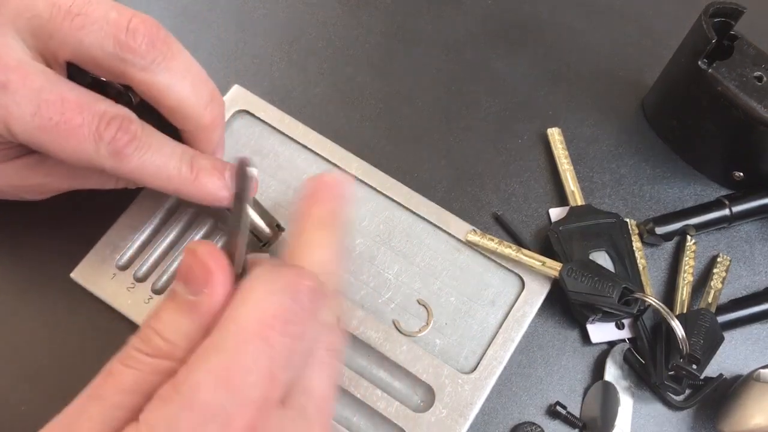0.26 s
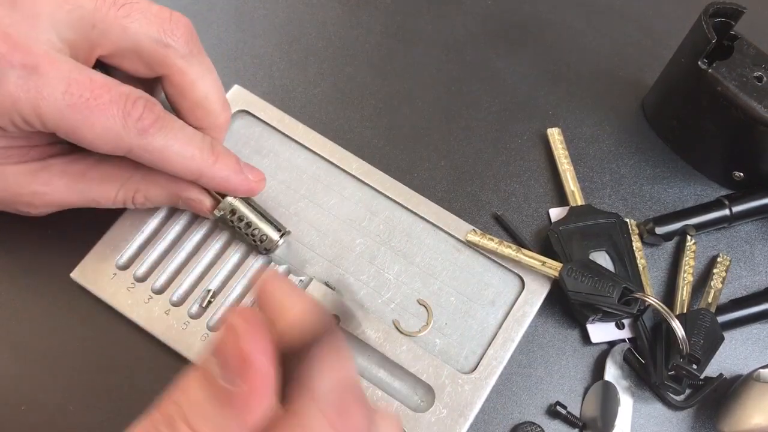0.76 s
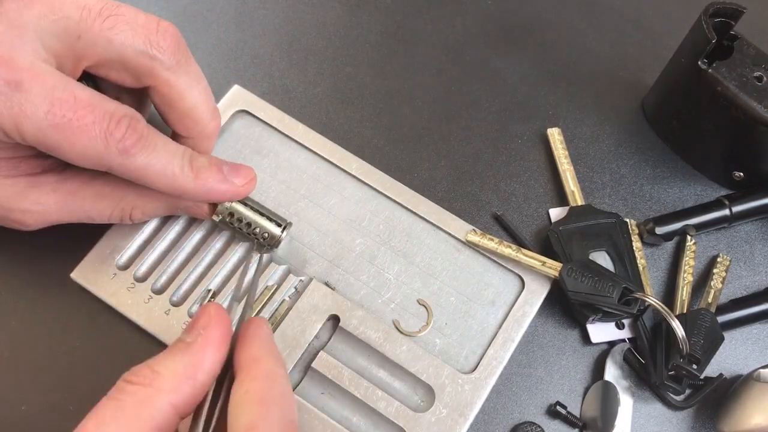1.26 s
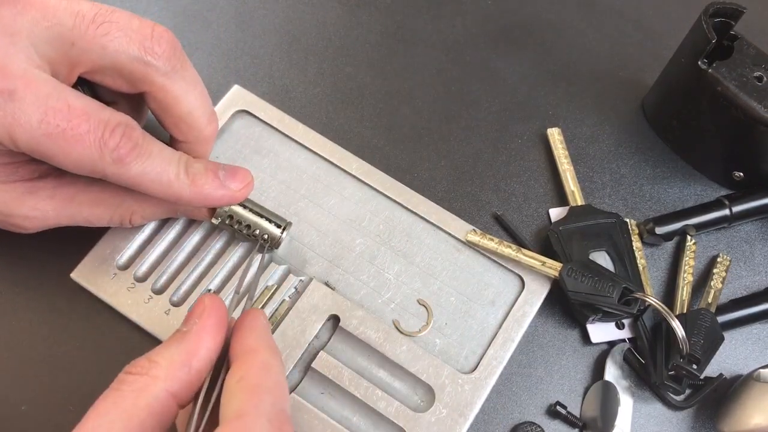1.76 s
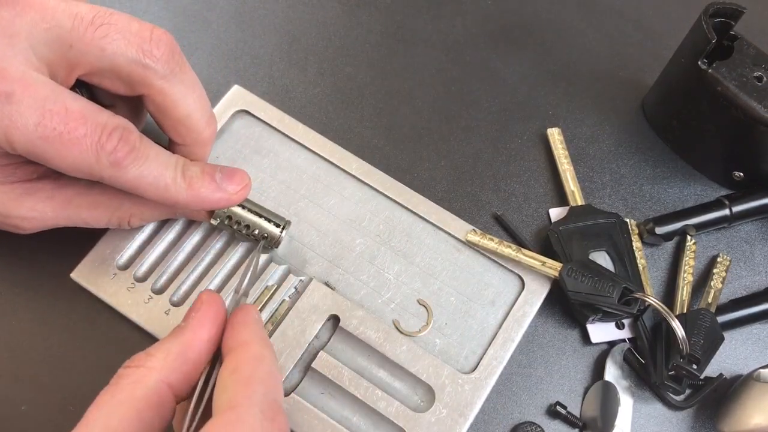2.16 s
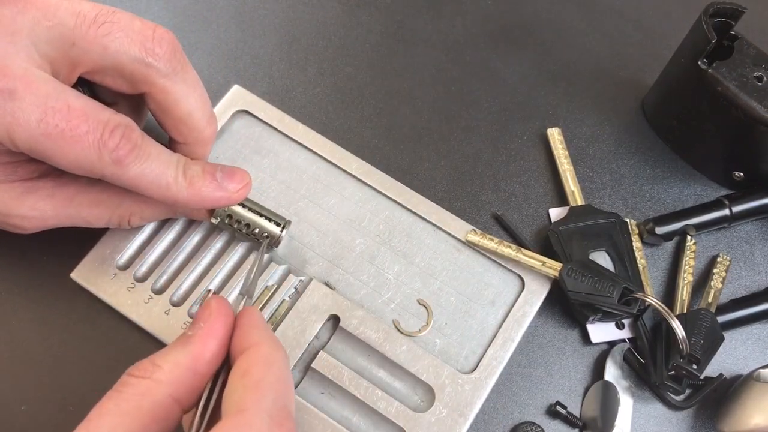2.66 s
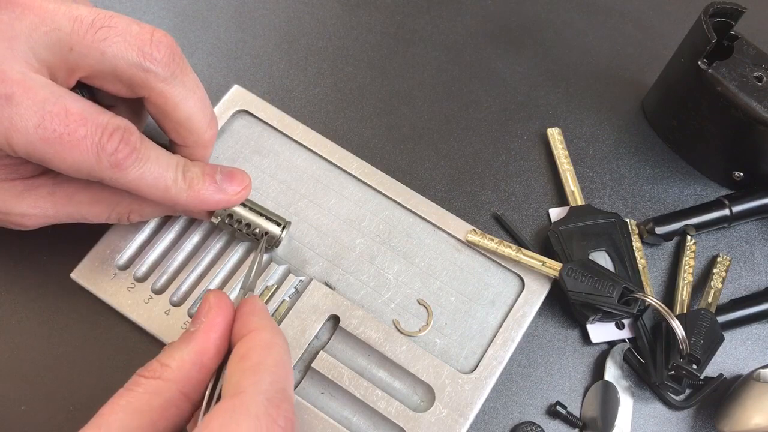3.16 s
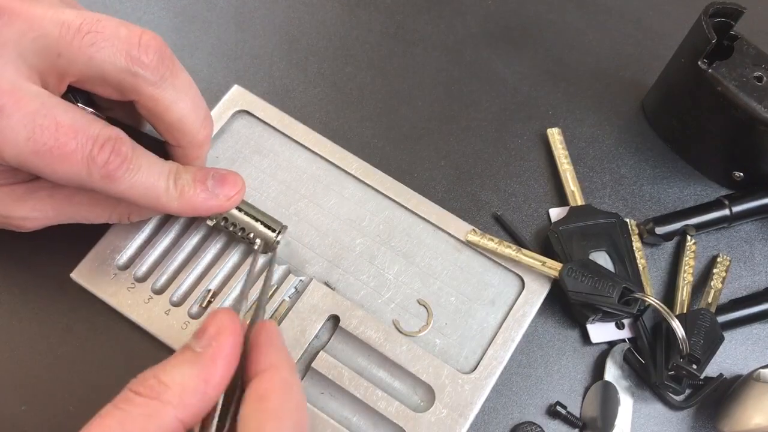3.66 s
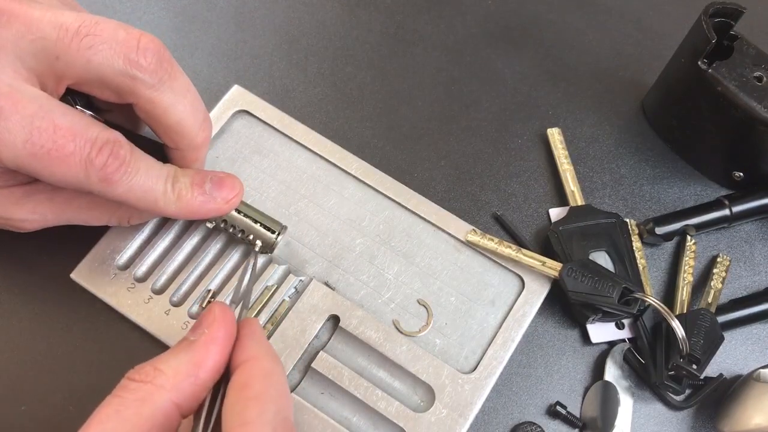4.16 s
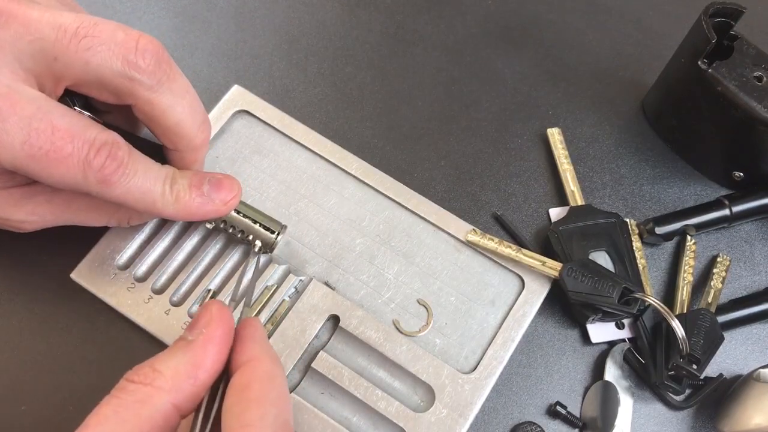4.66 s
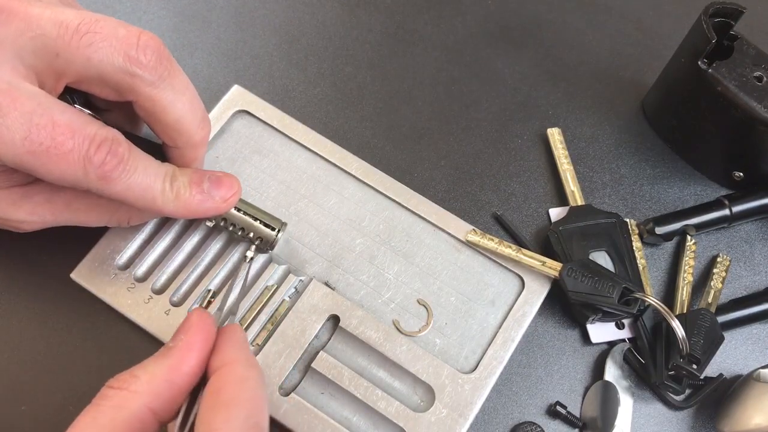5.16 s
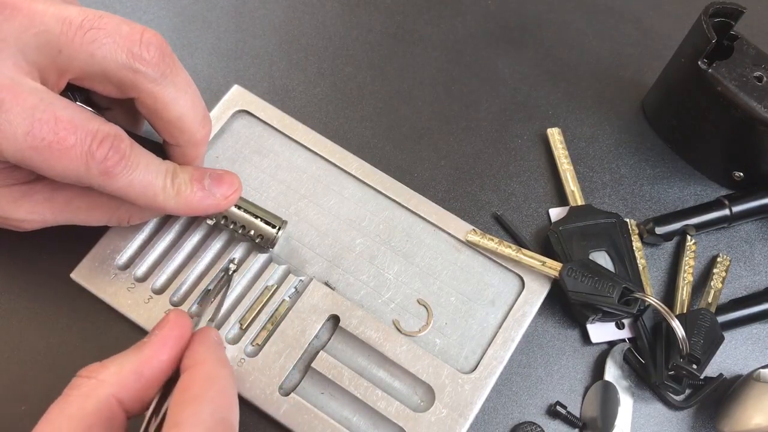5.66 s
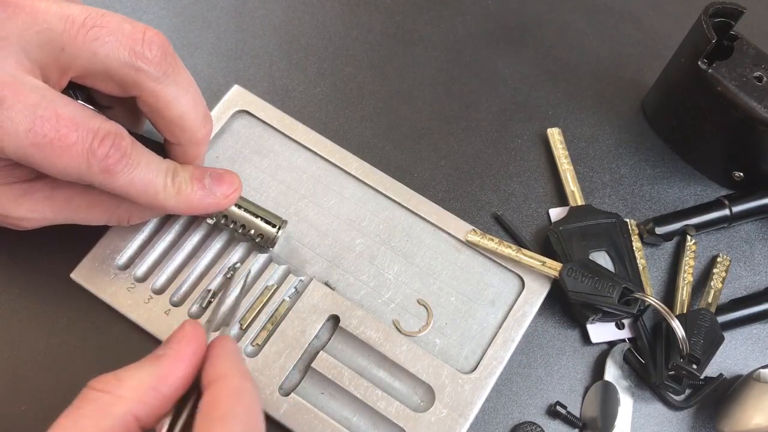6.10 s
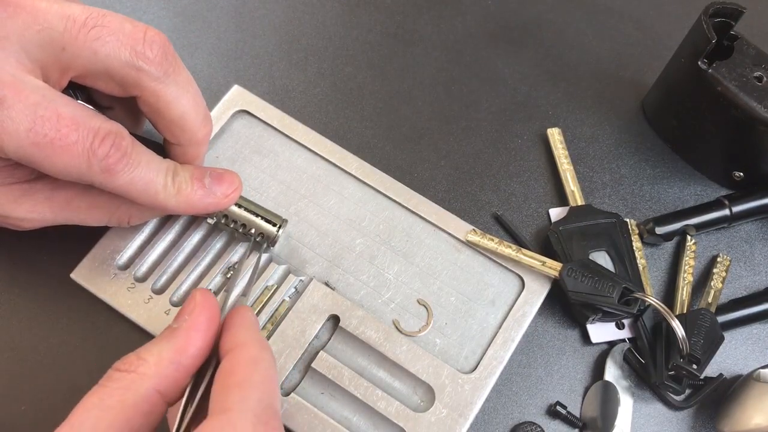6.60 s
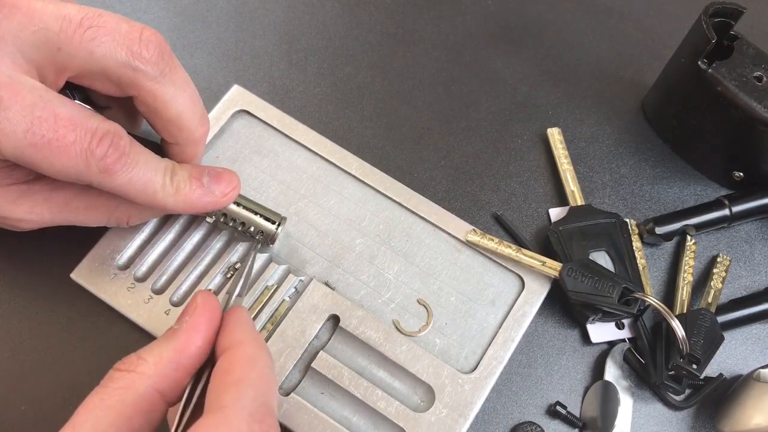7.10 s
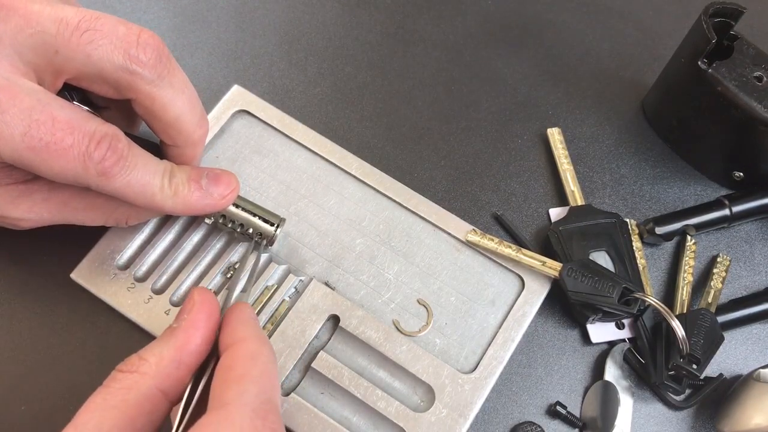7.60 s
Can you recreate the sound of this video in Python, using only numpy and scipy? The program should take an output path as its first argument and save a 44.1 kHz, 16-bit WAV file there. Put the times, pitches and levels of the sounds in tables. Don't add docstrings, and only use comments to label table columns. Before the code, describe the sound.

A hard, bright clank on a thick metal tray opens the scene, followed by a busy half second of lighter taps, dull desk thuds and a brief scrape. Then it grows quiet, with tiny nudges and isolated crisp ticks of pins and tweezers, sharper around two and three seconds. Close phone microphone, small quiet room, faint hiss and low hum.

```python
import sys
import numpy as np
from scipy import signal
from scipy.fft import rfft, irfft
from scipy.io import wavfile
from scipy.ndimage import uniform_filter1d

SR = 44100
rng = np.random.default_rng(int(sys.argv[2]) if len(sys.argv) > 2 else 0)


def unload_audio(sound):
    columns = np.transpose(np.atleast_2d(sound))
    steps = np.round(np.clip(columns, -1, 1) * 32767)
    wavfile.write(sys.argv[1], SR, steps.astype(np.int16))


def makeup_ratio(level_db):
    decades = np.asarray(level_db, float) / 20
    return 10 ** decades


N = 345744

# pitch_hz, density_db_per_hz
AIR_SPECTRUM = [(16, -32), (28, -1.5), (59, -13.5), (71, -24.5), (108, -16), (144, -27), (220, -15),
                (279, -16.5), (302, -29.5), (354, -27), (869, -35), (1160, -33.5), (1510, -36),
                (10700, -39.5), (15500, -41)]
AIR_DB = -65.5
# pitch_hz, width_hz, level_db
HUM = [(43.7, 3.6, -64), (114.04, 22, -75), (208, 3.5, -80.5), (265, 23, -75)]
# start_s, hold_s, level_db
LEANS = [
    (0.0, .5, -42),
    (.74, 0.024, -44.5),
    (1.05, .06, -53.5),
    (2.3, 0.033, -47),
    (2.64, 0.32, -52.5),
    (3.3, 0.16, -44),
    (5.3, .6, -54),
    (6.15, .22, -52),
    (7.56, 0.15, -50.5),
]
LEAN_RISE_DB_S, LEAN_FALL_DB_S, STILL_DB = 121, 98, -55

# start_s, level_db, pitch_hz, ring_t60_s,
# rattle_ms
TICKS = [(0.0383, -34, 5100, 0.0038, 0.51), (0.424, -50, 5420, 0.008, 2.2), (0.7172, -55, 6030, 0.012, 3.1),
         (0.733, -53, 5232, 0.0064, 1.3), (2.079, -56, 4980, 0.016, 1.7), (2.2172, -29, 11560, 0.02, 4.7),
         (2.222, -28, 4500, 0.012, 1.9), (2.2287, -50, 5260, .13, 2), (2.568, -37.5, 8880, 0.05, 2.7),
         (2.9587, -61, 5100, 0.01, 1.1), (3.276, -54, 11070, .01, 1.3), (3.2815, -29.5, 11720, 0.005, 0.84),
         (3.2825, -30, 8460, 0.012, .9), (3.949, -50.5, 8416, 0.02, 1.8), (3.959, -48, 11400, 0.032, 5.4),
         (3.971, -56, 12300, 0.019, 9.8), (4.1777, -43, 5970, 0.027, 1.75), (4.188, -60, 8090, 0.013, 1.4),
         (4.2954, -42, 5720, 0.015, 3.4), (4.306, -35.5, 6750, 0.027, 3.3), (4.4088, -56, 8500, 0.03, 2.4),
         (5.5993, -57.5, 4000, 0.0031, 1.1), (5.842, -37, 8460, 0.015, 2.0), (6.758, -57, 5500, .015, 1.9)]
# share_of_pitch, level_db
PIN_MODES = [(1, 8.5), (1.3, -7.5), (0.78, -4), (1.5, -11.5)]
# pitch_hz, density_db_per_hz
RATTLE_SPECTRUM = [(400, -34), (1200, -22), (3300, -17), (4600, -5), (6500, -3), (8600, -1), (10200, -5),
                   (12000, 0), (14500, -2), (16000, -10)]
RATTLE_FALL_DB_OCT = 5.5
RING_DB, RING_DB_PER_DECADE = 0.5, -10.5

# pitch_hz, level_db (within the family), t60_s
TRAY_MODES = [(1110, -5, .04), (1153, 0, .05), (1370, -16, .03), (1500, -20, .04), (2500, -4, .04),
              (2556, 0, .05), (2660, -1, .025), (2800, -5, .025), (3050, -13, .03), (3541, 0, .035),
              (3590, -1, .03), (3680, -1, .02), (3781, -10, .035), (3934, -11, .045), (4483, -24, .03),
              (5030, -15, .025), (5170, 0, .035), (5420, -17, .03), (5700, -18, .03), (6862, -20, .045),
              (7332, -28, .03), (7724, -20, .05), (7823, -14, .065), (8166, -24, .03), (9130, -28, .02),
              (10060, -18, .04), (10960, -21, .04), (11900, -25, .025), (12830, -27, .015),
              (14300, -21, .015)]
TRAY_SPLIT_HZ = (1900, 3300, 4200)
# start_s, bending_db, second_db, upper_db, knock_db
CLANK = [
    (.0447, -15, -17, -3.5, -32.5),
]
# start_s, bending_db, second_db, upper_db, knock_db
TAPS = [(0.1835, -46, -39, -36, -48.5), (0.2392, -65, -56, -46.5, -52.5), (0.428, -44.5, -60, -57, -46),
        (0.4658, -57, -58, -67, -62), (0.4784, -42, -46.5, -48, -65), (0.4968, -45, -48.5, -55, -47.5),
        (0.5908, -57, -65, -66, -52), (0.61, -41.5, -47, -54, -46), (0.6305, -51, -53.5, -55, -56),
        (0.6726, -58.5, -54, -78, -53), (0.7347, -74, -72, -80, -63.5), (2.2213, -37.5, -52, -40, -46.5),
        (3.2762, -47, -59, -54, -47), (4.3075, -70, -67, -83, -66), (5.842, -78, -76, -61, -71)]
# start_s, bending_db, knock_db
NUDGES = [(0.2743, -56.5, -74.5), (0.5548, -52, -68), (0.8066, -68, -70), (0.976, -68.5, -69),
          (1.1995, -62, -72), (1.2948, -68.5, -78), (1.5878, -57.5, -63.5), (1.665, -65.5, -68),
          (1.8866, -68.5, -77), (2.2177, -43, -47.5), (2.2314, -42, -55.5), (2.5707, -59.5, -80),
          (2.615, -66.5, -88), (2.9567, -67.5, -72), (3.3179, -68, -67), (3.3778, -75, -65.5),
          (3.9488, -56, -58.5), (4.1749, -67, -75), (4.2986, -57, -61), (5.1937, -65.5, -71),
          (5.6311, -64.5, -65.5), (5.7084, -71, -70), (5.8143, -68.5, -75), (6.1819, -71.5, -69.5),
          (6.3194, -77, -69.5), (6.7974, -61, -66), (6.9113, -67, -75), (7.309, -72, -82),
          (7.6363, -59, -64.5), (7.7125, -67.5, -74)]
# pitch_hz, density_db_per_hz
KNOCK_SPECTRUM = [(250, -30.5), (520, -17), (770, 3), (1000, -3.5), (1400, -4), (1800, -9), (2700, -12),
                  (5000, -21.5), (12000, -38)]
# pitch_hz, density_db_per_hz
WASH_SPECTRUM = [(300, -5.5), (1500, -4.5), (2800, -2), (4400, -2.5), (6300, -3), (9000, -12), (14000, -16),
                 (16000, -26)]
THIRD_SHARE, THIRD_DB = 0.24, 2
LIGHT_CONTRAST, LIGHT_DB_PER_DECADE = 1.5, 30
LIGHT_DULL_DB_OCT = 8

# pitch_hz, density_db_per_hz
SHIMMER_SPECTRUM = [(1500, -25), (2300, -7.5), (2800, 1.5), (3500, -1.5), (4500, -8.5), (8000, -11),
                    (14000, -25.5)]
# pitch_hz, density_db_per_hz
SLAP_SPECTRUM = [(200, -12), (350, 1.5), (500, -0.5), (800, -3), (1500, -21.5)]
SHIMMER_DB, SHIMMER_MS, SLAP_DB, SLAP_MS = -30, 38, -24.5, 2.2

# pitch_hz, level_db, t60_s
DESK_MODES = [(22, 0, 0.2), (45, -7, 0.19), (118.55, -1.5, 0.49), (160.3, -1.5, 0.29), (201, -5.5, 0.018),
              (295, -5, 0.101), (321, -4.5, 0.093), (422, -11.5, 0.062)]
DESK_SPLIT_HZ = (150, 60)
DESK_SAG = .25
# start_s, thud_db, boom_db, sway_db, contact_ms
BUMPS = [(0.045, -40, -41, -55.5, 5.9), (0.109, -48.5, -40.5, -32.5, 3.1), (0.237, -35.5, -41.5, -57, 4.2),
         (0.423, -29.5, -37, -48, 2.86), (0.46, -41.5, -61, -36, 3.3), (0.594, -54, -67, -49, 0.95),
         (2.218, -38, -46, -53, 1.6), (3.278, -43.5, -56, -41, 1.27), (3.31, -51, -58, -36, 1.5),
         (3.952, -52, -67, -46, 2.9), (4.303, -53, -78, -63.5, 1.2), (7.835, -54.5, -60, -60, 2.2)]

# pitch_hz, width_hz, level_db
WOOD = [(222, 16, 0), (268, 16, 0), (370, 40, -8), (490, 40, -12), (580, 15, -13), (1000, 300, -18),
        (1150, 40, -18)]
# start_s, hold_s, level_db
HAND = [
    (.43, 0.0045, -46.5),
    (.612, 0.0087, -59.5),
    (2.56, .15, -62),
    (2.78, .12, -63),
    (2.95, .28, -72),
]
# start_s, hold_s, level_db
DRAGS = [
    (.465, .05, -65),
    (.6, .11, -69),
]
# start_s, hold_s, level_db
ROLLS = [
    (.88, .08, -78),
    (.975, .02, -74),
    (1.03, 0.055, -78),
    (6.89, .065, -76),
    (7.01, .02, -72.5),
]
HAND_RISE_DB_S, HAND_FALL_DB_S = 900, 213
DRAG_RISE_DB_S, DRAG_FALL_DB_S = 250, 200
ROLL_RISE_DB_S, ROLL_FALL_DB_S = 500, 600

ROOM_T60_S, ROOM_TOP_T60_S = .25, .17
ROOM_LOW_HZ = 710
TRAY_WET_DB, PIN_WET_DB = -12.5, -17
LIMIT = .76


def level(x, db):
    return x * makeup_ratio(db) / np.sqrt(np.mean(x ** 2))


def peak(x, db):
    return x * makeup_ratio(db) / np.max(np.abs(x))


def add(out, start_s, sound):
    i = int(start_s * SR)
    out[i:i + len(sound)] += sound[:N - i]


def coloured(spectrum, size):
    hz, db = np.transpose(spectrum)
    f = np.arange(size // 2 + 1) * SR / size + 1
    gain = makeup_ratio(np.interp(np.log(f), np.log(hz), db))
    return irfft(rfft(rng.standard_normal(size)) * gain, size)


def resonant(hz, width_hz):
    return signal.lfilter(*signal.iirpeak(hz, hz / width_hz, fs=SR), rng.standard_normal(N))


def walk(rate_hz):
    k = int(SR / rate_hz)
    steps = np.repeat(rng.standard_normal(N // k + 1), k)
    smooth = uniform_filter1d(uniform_filter1d(steps, k), k)
    return level(smooth[:N], 0)


def strokes(rows, rise_db_s, fall_db_s):
    start, hold, db = np.transpose(rows)[:, :, None]
    t = np.arange(N) / SR
    rise = rise_db_s * np.maximum(start - t, 0)
    fall = fall_db_s * np.maximum(t - start - hold, 0)
    return makeup_ratio(db - rise - fall).sum(axis=0)


def swell(ms, size):
    u = np.arange(1, size + 1) / (SR * max(ms, .02) / 1000)
    return (1 - np.exp(-3 * u)) * np.exp(-u)


def contact(ms, size=2048):
    return rng.standard_normal(size) * swell(ms, size)


def burst(spectrum, ms, db, size=2048):
    return peak(coloured(spectrum, size) * swell(ms, size), db)


def ring(modes, size, sag=0.):
    hz, db, t60 = np.transpose(modes)[:, :, None]
    t = np.arange(size) / SR
    bent = t + sag * .03 * (1 - np.exp(-t / .03))
    return makeup_ratio(db) * np.sin(2 * np.pi * hz * bent) * np.exp(-np.log(1000) * t / np.maximum(t60, .003))


def air():
    hum = sum(level(resonant(hz, width), db) * makeup_ratio(2.4 * walk(3)) for hz, width, db in HUM)
    rumble = coloured([(1, -10), (4, -1), (16, 0.0), (30, -16.5), (60, -38), (200, -83.5)], size=N)
    rocking = makeup_ratio(STILL_DB) + strokes(LEANS, LEAN_RISE_DB_S, LEAN_FALL_DB_S)
    hiss = level(coloured(AIR_SPECTRUM, size=N), AIR_DB) * makeup_ratio(0.45 * walk(2.4))
    return hiss + hum + level(rumble, 0) * rocking


def pins():
    out = np.zeros(N)
    for start, db, hz, t60, ms in TICKS:
        rattle = [(f, d - RATTLE_FALL_DB_OCT * max(np.log2(f / hz), 0)) for f, d in RATTLE_SPECTRUM]
        add(out, start, burst(rattle, ms, db))
        modes = [(min(hz * r, .45 * SR), d, t60 if r == 1 else .008) for r, d in PIN_MODES]
        ringing = signal.fftconvolve(contact(ms / 2), ring(modes, size=6000).sum(axis=0))
        ring_db = RING_DB + RING_DB_PER_DECADE * np.log10(max(t60, .003) * 100)
        add(out, start, peak(ringing, db + ring_db))
    return out


def light(modes):
    hz, db, t60 = np.transpose(modes)
    low = LIGHT_CONTRAST * db + LIGHT_DB_PER_DECADE * np.log10(t60)
    high = db - LIGHT_DULL_DB_OCT * np.log2(hz / TRAY_SPLIT_HZ[-1])
    return np.transpose([hz, np.where(hz < TRAY_SPLIT_HZ[-1], low, high), t60])


def strike(out, start, body, ms, t60_scale, family_db, knock_db):
    modes = np.array(body) * [1, 1, t60_scale]
    family = np.digitize(modes[:, 0], TRAY_SPLIT_HZ)
    spot_db = 1.5 * rng.standard_normal((len(modes), 1))
    rings = ring(modes + spot_db * [0, 1, 0], size=8192)
    sense = (-1) ** np.arange(len(modes))[:, None]
    rings *= sense * (1 - np.exp(-np.arange(8192) / (SR * .00025)))
    force = contact(ms)
    for k, db in enumerate(family_db):
        add(out, start, peak(signal.fftconvolve(force, rings[family == k].sum(axis=0)), db))
    add(out, start, burst(KNOCK_SPECTRUM, 5.3 + ms, knock_db + 8.5))
    if len(family_db) > 1:
        add(out, start, burst(WASH_SPECTRUM, 6.9, max(family_db[1:]) - 12))


def tray():
    out = np.zeros(N)
    for rows, body, t60_scale in ((CLANK, TRAY_MODES, 1.05), (TAPS, light(TRAY_MODES), 1.7)):
        for start, bend_db, second_db, upper_db, knock_db in rows:
            third_db = second_db + THIRD_SHARE * (upper_db - second_db) + THIRD_DB
            family_db = [bend_db, second_db, third_db, upper_db]
            strike(out, start, body, ms=.03, t60_scale=t60_scale, family_db=family_db, knock_db=knock_db)
    for start, bend_db, knock_db in NUDGES:
        strike(out, start, TRAY_MODES, ms=3., t60_scale=1.1, family_db=[bend_db], knock_db=knock_db)
    return out


def clank_body():
    out = np.zeros(N)
    start = CLANK[0][0]
    add(out, start, burst(SHIMMER_SPECTRUM, SHIMMER_MS, SHIMMER_DB, size=16384))
    add(out, start, burst(SLAP_SPECTRUM, SLAP_MS, SLAP_DB))
    return out


def desk():
    out = np.zeros(N)
    family = np.digitize(np.array(DESK_MODES)[:, 0], DESK_SPLIT_HZ)
    sharp = -ring(DESK_MODES, size=24000, sag=DESK_SAG)
    steady = -ring(DESK_MODES, size=24000)
    rings = np.where(family[:, None] == 0, sharp, steady)
    for start, *family_db, ms in BUMPS:
        push = np.hanning(int(SR * ms / 1000) + 3)
        for k, db in enumerate(family_db):
            add(out, start, peak(signal.fftconvolve(push, rings[family == k].sum(axis=0)), db))
    return out


def slides():
    wood = sum(makeup_ratio(db) * level(resonant(hz, width), 0) for hz, width, db in WOOD)
    wood = level(wood, 0) * makeup_ratio(2.5 * walk(25))
    grit = rng.standard_normal(N) * makeup_ratio(2.0 * walk(58.7))
    plate = ring(light(TRAY_MODES) * [1, 1, 2], size=8192)[:14].sum(axis=0)
    metal = level(signal.fftconvolve(grit, plate)[:N], 0)
    groove = resonant(5740.0, 900.) + .8 * resonant(7900.0, 900.) + 0.43 * resonant(13500., 2000.)
    groove = level(groove, 0) * makeup_ratio(2.4 * walk(100))
    hand = wood * strokes(HAND, HAND_RISE_DB_S, HAND_FALL_DB_S)
    drag = metal * strokes(DRAGS, DRAG_RISE_DB_S, DRAG_FALL_DB_S)
    return hand + drag + groove * strokes(ROLLS, ROLL_RISE_DB_S, ROLL_FALL_DB_S)


def room(x):
    t = np.arange(16000) / SR
    noise = rng.standard_normal(len(t))
    low = signal.lfilter(*signal.butter(1, 4500, fs=SR), noise)
    top = noise - low
    tail = low * np.exp(-np.log(1000) * t / ROOM_T60_S) + top * np.exp(-np.log(1000) * t / ROOM_TOP_T60_S)
    tail = signal.lfilter(*signal.butter(1, ROOM_LOW_HZ, "high", fs=SR), tail)
    tail *= np.minimum(t / 0.002, 1)
    return signal.fftconvolve(x, tail / np.sqrt(np.sum(tail ** 2)))[:N]


def scene():
    taps, ticks = tray(), pins()
    wet = room(taps * makeup_ratio(TRAY_WET_DB) + ticks * makeup_ratio(PIN_WET_DB))
    return (taps + ticks + wet + desk() + slides() + air() + clank_body())[None]


def roll_off(x):
    return signal.sosfilt(signal.butter(12, 16820, fs=SR, output="sos"), x)


def record(dry):
    rounded = LIMIT * np.tanh(dry / LIMIT)
    low_pass = signal.ellip(8, .2, 60, 15900, fs=SR, output="sos")
    return roll_off(signal.sosfilt(low_pass, rounded))


dry = scene()
out = record(dry)
unload_audio(out)
```